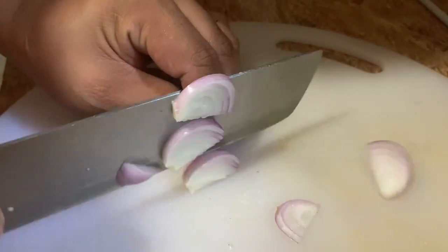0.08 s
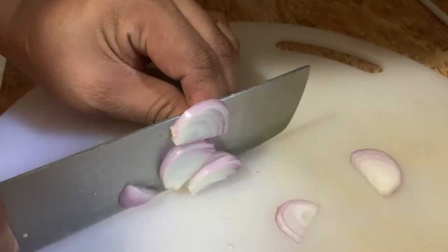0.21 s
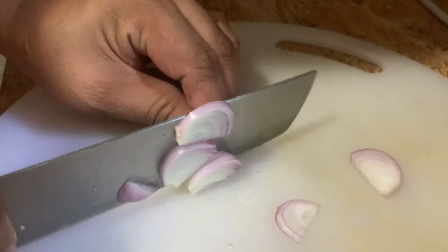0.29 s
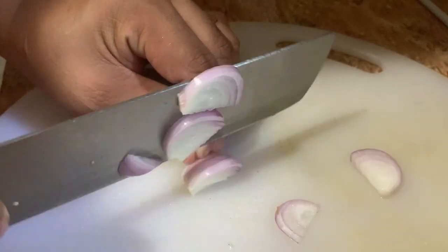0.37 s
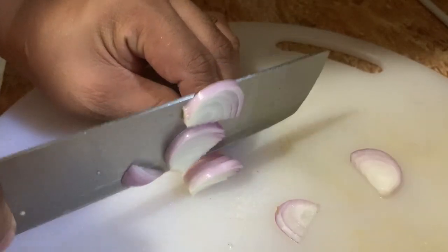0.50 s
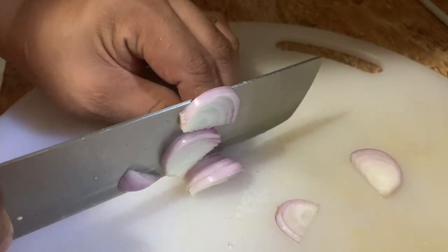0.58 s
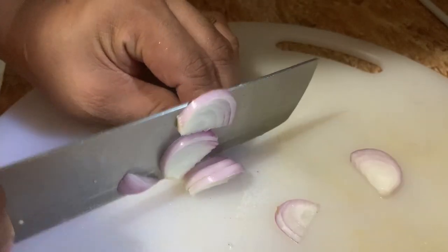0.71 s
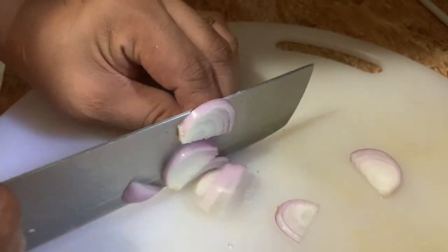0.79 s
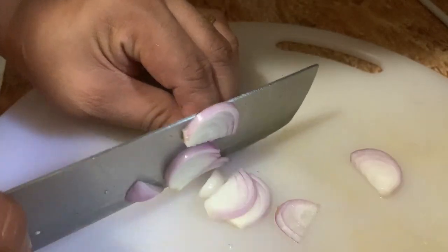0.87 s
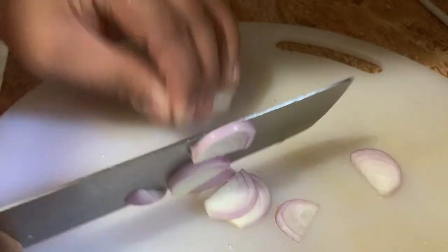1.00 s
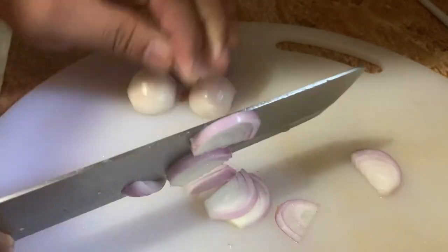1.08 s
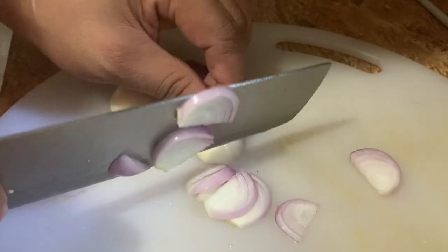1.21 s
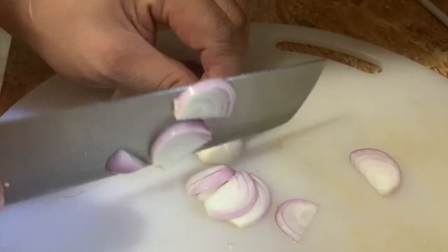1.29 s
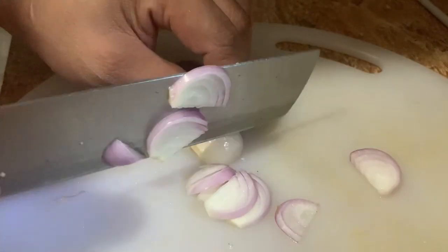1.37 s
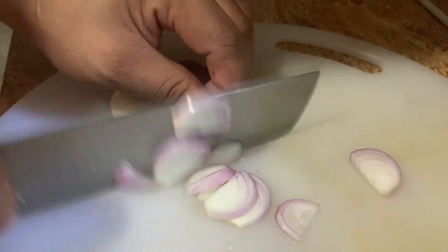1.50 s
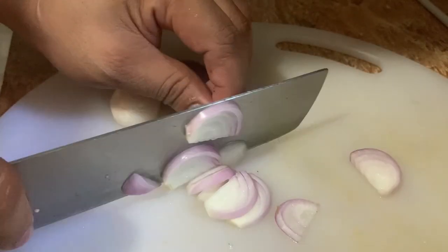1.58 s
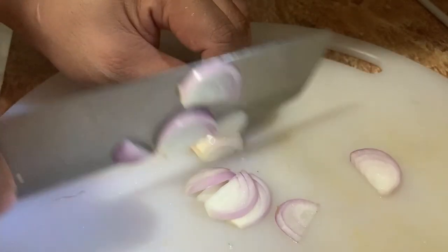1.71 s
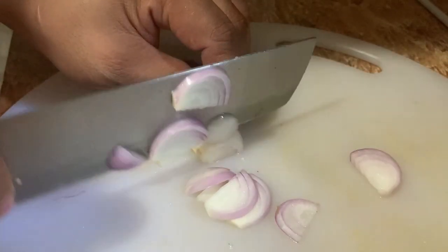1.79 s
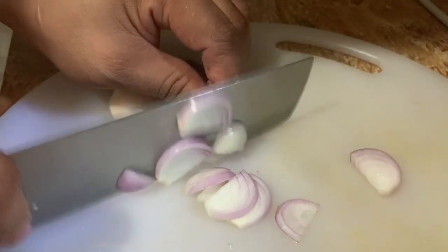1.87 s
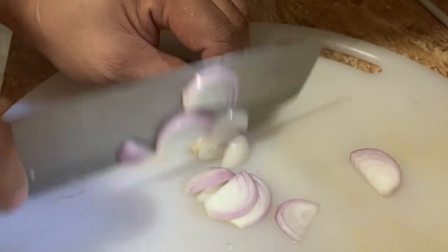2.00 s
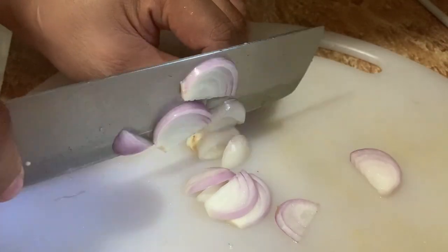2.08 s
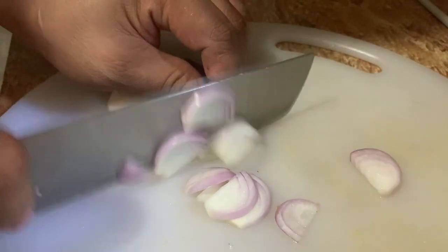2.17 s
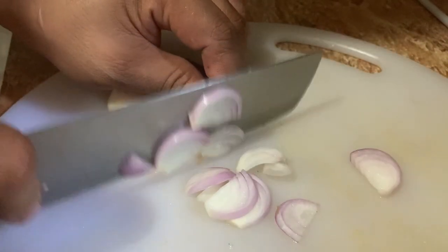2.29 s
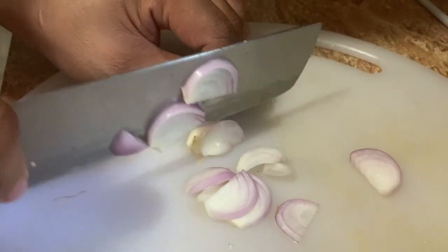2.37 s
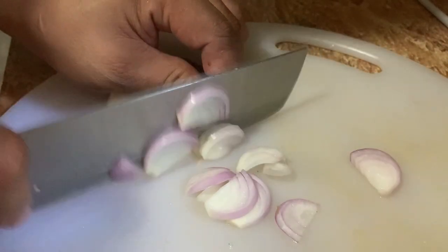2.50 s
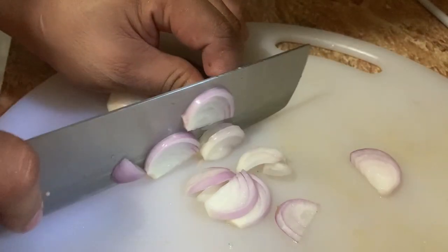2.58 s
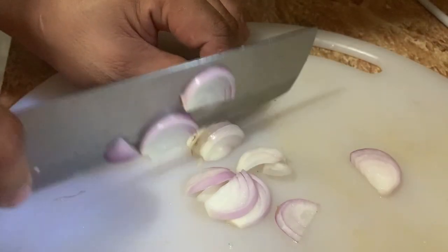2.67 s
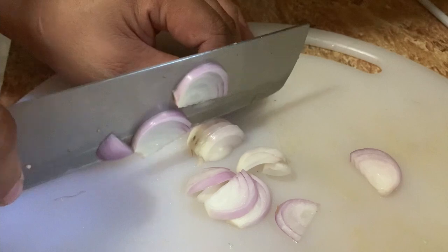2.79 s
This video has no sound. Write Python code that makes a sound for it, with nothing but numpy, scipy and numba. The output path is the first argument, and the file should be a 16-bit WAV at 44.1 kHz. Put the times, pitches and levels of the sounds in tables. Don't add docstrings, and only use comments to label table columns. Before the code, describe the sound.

A large knife crunches through wet onion layers and knocks hard on a plastic cutting board

```python
import sys
import numpy as np
from scipy import signal
from scipy.fft import rfft, irfft
from scipy.io import wavfile
from scipy.ndimage import uniform_filter1d
from numba import njit

SR = 44100
rng = np.random.default_rng(int(sys.argv[2]) if len(sys.argv) > 2 else 0)


def master_out(mix):
    frames = np.transpose(np.atleast_2d(mix))
    ceiling = np.clip(frames, -1, 1)
    pcm = np.round(ceiling * 32767).astype(np.int16)
    wavfile.write(sys.argv[1], SR, pcm)


def to_linear_factor(level_db):
    exponent = np.asarray(level_db, float) / 20
    return 10 ** exponent


N = 125685
T, F = np.arange(N) / SR, np.arange(N // 2 + 1) * SR / N

# time in s, peak in dB, contact time in ms, brightness in dB.
BLADE_KNOCKS = [(0.2146, 2.5, 0.16, 10), (0.824, -6, 0.56, 3), (1.081, -39, 1, -7), (1.565, 1.5, 0.85, -10),
                (1.934, 1, 0.27, 5.5), (2.233, 1, 0.35, 3), (2.567, -1.5, 0.91, -2), (1.841, -27, 0.4, 12),
                (2.207, -19, 0.37, 0), (2.5295, -29.5, 0.46, 0), (2.552, -22.5, 0.51, 2)]


def unit(x):
    return x / np.sqrt(np.mean(x ** 2))


def colour(x, points):
    hz, db = np.array(points).T
    return irfft(rfft(x) * to_linear_factor(np.interp(np.log(F + 1), np.log(hz), db)), N)


def ring(x, hz, t60):
    pole = np.exp(2j * np.pi * hz / SR - np.log(1000) / (t60 * SR))
    return signal.lfilter([1], [1, -pole], x).imag


def walk(rate):
    hold = int(SR / rate)
    steps = np.repeat(rng.standard_normal(N // hold + 1), hold)
    return unit(uniform_filter1d(uniform_filter1d(steps, hold), hold)[:N])


def force(tables, columns):
    out = np.zeros(N)
    for rows in map(np.array, tables):
        edge = np.clip(np.minimum(T - rows[0, 0], rows[-1, 0] - T) / 0.002, 0, 1)
        out += edge * to_linear_factor(np.interp(T, rows[:, 0], rows[:, 1:columns + 1].sum(axis=1)))
    return out


def crackle():
    grains_per_s, spread_db, fizz_db, stripe_db = 6000, 2, 2, 2.2
    hit = rng.random(N) < grains_per_s / SR
    clicks = hit * rng.standard_normal(N) * to_linear_factor(spread_db * rng.exponential(size=N))
    grains = unit(unit(clicks) + to_linear_factor(fizz_db) * rng.standard_normal(N))
    return grains * to_linear_factor(stripe_db * walk(150))


def patchy(x):
    patch_db, patches_per_s = 2.4, 110
    spectrum, centres = rfft(x), np.linspace(0, 18000, num=15)
    out = 0
    for hz in centres:
        band = np.clip(1 - np.abs(F - hz) / centres[1], 0, 1)
        out = out + to_linear_factor(patch_db * walk(patches_per_s)) * irfft(spectrum * band, N)
    return out


def snaps_and_ticks():
    # time in s, peak in dB, t60 in s, low part in dB.
    wet_ticks = [(0.0276, -38.5, 0.041, -10), (0.385, -50.5, 0.053, 5.5), (0.6196, -35, 0.038, -18),
                 (0.8425, -13.5, 0.012, -9.5), (0.8948, -53, 0.045, 6), (0.997, -48, 0.17, -11),
                 (1.0289, -33.5, 0.013, -14), (1.0807, -43, 0.025, -22), (1.2054, -51.5, 0.2, -2),
                 (1.681, -45, 0.036, -4), (2.02, -49.5, 0.057, -1), (2.0675, -37, 0.053, -8.5),
                 (2.4155, -23, 0.026, -12.5), (2.72, -42.5, 0.064, -25.5), (2.7733, -25.5, 0.033, -11.5),
                 (2.814, -31, 0.034, -15), (2.833, -46.5, 0.11, -7)]
    # time in s, peak in dB, t60 in s, low part in dB.
    layer_snaps = [(0.1602, -30, 0.03, -9), (0.175, -28, 0.015, -20), (0.187, -33, 0.02, -11),
                   (0.1964, -20, 0.04, -7.5), (0.205, -20, 0.044, -10.5), (0.213, -16, 0.02, -7),
                   (0.8066, -21, 0.033, -21), (0.816, -14, 0.02, -4), (1.524, -29, 0.03, -29),
                   (1.8417, -23.5, 0.036, -2.5), (1.889, -23.5, 0.034, -7), (1.9104, -25.5, 0.03, -15),
                   (1.918, -18.5, 0.033, -5), (2.167, -40, 0.026, -5), (2.1805, -29.5, 0.036, -4),
                   (2.209, -21.5, 0.024, -2.5), (2.5023, -22.5, 0.023, -4), (2.521, -26, 0.013, -17),
                   (2.5305, -15, 0.018, -6), (2.552, -20, 0.02, -5), (2.56, -20.5, 0.029, -5)]
    rise_s = 0.0012
    ticks, thuds = np.zeros(N), np.zeros(N)
    for s, db, t60, low_db in [*wet_ticks, *layer_snaps]:
        late_db = 60 * np.abs(T - s) / max(t60, 0.005)
        fall = np.clip((T - s) / rise_s + 0.5, 0, 1) * to_linear_factor(db - 11 - late_db)
        ticks += fall
        thuds += to_linear_factor(low_db) * fall
    return ticks, thuds


def blade(rubbing):
    # start in s, length in s, level in dB, pitch in Hz.
    whistles = [(0.665, 0.038, -63.5, 4440), (0.73, 0.052, -60, 4550), (0.814, 0.018, -34.5, 4850),
                (1.514, 0.038, -42, 4360), (1.522, 0.025, -49.5, 6800), (1.527, 0.063, -42.5, 11300),
                (1.89, 0.042, -44, 11400), (1.898, 0.034, -47, 5000), (2.523, 0.017, -40, 6700),
                (2.535, 0.027, -40, 11400), (0.2, 0.013, -34.5, 10870)]
    out = np.zeros(N)
    for s, length, db, hz in whistles:
        arch = np.sin(np.pi * np.clip((T - s) / length, 0, 1))
        out += to_linear_factor(db) * np.sqrt(np.clip(arch, 0, 1)) * unit(ring(rubbing, hz, 0.009))
    return to_linear_factor(3 * walk(120)) * out


def onion():
    # time in s, crunch in dB, push into the board relative to the crunch in dB.
    strokes = [
        [(0.09, -71, -18), (0.166, -44, -15.5), (0.182, -52.5, -10), (0.198, -35.5, -8), (0.214, -28.5, -3),
         (0.236, -48, -14), (0.3, -71, -12)],
        [(0.72, -81, -14), (0.73, -54.5, -16), (0.82, -31.5, -19), (0.838, -39, -18), (0.844, -37.5, -12),
         (0.854, -44, -14), (0.92, -71, -16)],
        [(1.48, -79, -12), (1.49, -63, -16), (1.532, -34.5, -15.5), (1.568, -31.5, -8), (1.578, -44.5, -16),
         (1.65, -68, -14)],
        [(1.835, -55, -12), (1.843, -42.5, -19), (1.859, -48, -7), (1.887, -37, -15), (1.915, -30, -16),
         (1.939, -32.5, -9), (1.955, -53.5, -22), (2.0, -62.5, -19)],
        [(2.16, -72, -14), (2.166, -56, -8), (2.212, -30.5, -9.5), (2.236, -27, -2), (2.258, -51, -14),
         (2.31, -65, -12)],
        [(2.495, -52, -10), (2.501, -37.5, -15.5), (2.519, -40, -11), (2.529, -33.5, -15), (2.567, -28, -16),
         (2.579, -46.5, -23), (2.64, -63, -17)],
    ]
    # time in s, level in dB.
    slides = [
        [(0.27, -80), (0.36, -63), (0.42, -76.5)],
        [(0.61, -87.5), (0.668, -58.5), (0.73, -71)],
        [(0.97, -71.5), (1.13, -80)],
        [(1.64, -72), (1.71, -74)],
        [(2.0, -70), (2.064, -63), (2.1, -86)],
        [(2.36, -67), (2.45, -63)],
        [(2.66, -70), (2.726, -72), (2.85, -87)],
    ]
    # frequency in Hz, level in dB.
    crunch = [(2200, -18.5), (3300, -5), (4500, 0), (6500, 0), (8000, 0), (11000, 4), (13300, 2),
              (15500, 3.5)]
    # frequency in Hz, level in dB.
    unlike = [(5000, 0), (7500, -15)]
    ticks, thuds = snaps_and_ticks()
    shared = crackle()
    air = np.array([shared + colour(crackle(), unlike) for _ in range(2)])
    gain = force(strokes, 1) + force(slides, 1) + ticks
    air = gain * unit(patchy(colour(air, crunch)))
    push = force(strokes, 2) + thuds
    bite = to_linear_factor(3.5) * push * unit(ring(np.array([crackle(), crackle()]), 2320, 0.0038))
    return to_linear_factor(2.5) * (air + blade(shared)) + bite, push * crackle()


def board(push):
    # frequency in Hz, level in dB, t60 in s, left minus right in dB.
    modes = [(157.5, -20.5, 0.055, 32.5), (214, -32, 0.24, -42.5), (332, -1.5, .06, 0), (353, 3, 0.09, 2.5),
             (462.8, 6.5, 0.038, -1.5), (505, -14, 0.18, -27), (689, -2, 0.12, -14), (788, 1.5, 0.018, 21),
             (983, 0.5, 0.028, 2.5), (1254, 8.5, 0.016, 4.5), (1483, 0, 0.035, 1), (1940, -9, 0.0086, 25),
             (2070, -3, 0.012, -19.5), (2580, -4, 0.019, 31)]
    front = (1020, 14.5, 0.0033, 1.5)
    knock_db, scatter_db, longest_t60_s = -9, 2, 0.055
    delay_300hz_ms, delay_power, right_lag_ms = 3.214, 0.778, 0.16
    low_hz, top_hz = 190, 2400
    out = np.zeros((2, N))
    scatter = rng.standard_normal((len(BLADE_KNOCKS), len(modes) + 1))
    for k, (hz, db, t60, pan_db) in enumerate([front, *modes]):
        drive = push.copy()
        for (s, peak_db, ms, _), luck in zip(BLADE_KNOCKS, scatter):
            blow = np.exp(-((T - s - 0.001) / (ms * 0.000095)) ** 2)
            drive -= to_linear_factor(peak_db + knock_db + scatter_db * luck[k]) / ms * blow
        out += ring(drive, hz, min(t60, longest_t60_s)) * to_linear_factor(db + np.array([[0.5], [-0.5]]) * pan_db)
    delay = delay_300hz_ms / 1000 * (np.maximum(F, 100) / 300) ** -delay_power
    delay = delay + np.array([[0], [right_lag_ms / 1000]])
    turn = np.exp(-2j * np.pi * np.cumsum(delay, axis=1) * SR / N)
    loss = 1 + (low_hz / (F + 1)) ** 4 + (F / top_hz) ** 6
    return irfft(rfft(out) * turn / loss, N) / 20


def clatter():
    # frequency in Hz, level in dB.
    tail_points = [(150, -32), (400, 6), (1200, 5.5), (2500, -8), (5000, -54.5)]
    resonance_hz = [347.8, 454]
    tail_db, tail_t60_s, rise_s, resonance_db = -23, 0.17, 0.0069, -1.5
    crack_hz, crack_db, crack_t60_s = 2280, -17.5, 0.035

    def fall(s, db, t60):
        return to_linear_factor(db - 60 * np.abs(T - s) / t60) * np.clip((T - s) / rise_s, 0, 1)

    dull, bright = np.zeros(N), np.zeros(N)
    for s, db, _, up_db in BLADE_KNOCKS:
        dull += fall(s, db + tail_db, tail_t60_s)
        bright += fall(s, db + up_db + crack_db, crack_t60_s)
        bright += fall(s, db + up_db + crack_db - 21.5, 1.45 * tail_t60_s)
    noise = rng.standard_normal((2, 2, N))
    resonance = sum(unit(ring(noise[0], hz, 0.11)) for hz in resonance_hz)
    tail = unit(colour(noise[0], tail_points)) + to_linear_factor(resonance_db) * resonance
    crack = unit(ring(noise[1], crack_hz, 0.0023))
    return to_linear_factor(2 * walk(200)) * (dull * tail + bright * crack)


def ports(x):
    # frequency in Hz, lead in radians.
    lead = [(0, 0), (2500, -3.1), (6500, -5.4), (8000, -4.4), (8700, -3.14), (9400, -1.9), (12800, 1.9),
            (13400, 3.14), (14000, 4.4), (15300, 6.1), (22050, 6.5)]
    hz, turn = np.array(lead).T
    right = irfft(rfft(x[1]) * np.exp(1j * np.interp(F, hz, turn)), N)
    return np.array([x[0], right])


@njit
def walls(x, lags, gain, damp):
    line, soft, out = np.zeros((8, 4096)), np.zeros(8), np.zeros((2, len(x)))
    for i in range(len(x)):
        total = 0.
        for k in range(8):
            soft[k] += (1 - damp) * (gain[k] * line[k, (i - lags[k]) & 4095] - soft[k])
            total += soft[k]
            out[k % 2, i] += soft[k]
        for k in range(8):
            line[k, i & 4095] = x[i] + soft[k] - total / 4
    return out


def room(x):
    t60_s, damp = 0.26, 0.23
    lags = np.array([211, 293, 397, 509, 631, 773, 929, 1103])
    return walls(x.mean(axis=0) + 1e-18, lags, to_linear_factor(-60 * lags / SR / t60_s), damp)


def kitchen():
    # frequency in Hz, level in dB per Hz.
    tone = [(35, -59), (45, -16), (160, -10.5), (300, -20.5), (1270, -26.5), (3000, -36), (7000, -53.5),
            (16000, -54.5)]
    # frequency in Hz, width in Hz, level in dB.
    hums = [(49.1, 15, -60.5), (99.7, 5.7, -59.5), (119.4, 23, -54.5), (348, 25, -64.5), (470.8, 23, -62),
            (727, 28, -70), (1250, 270, -66)]
    # time in s, kitchen swell in dB, motor tone in dB.
    swell = [
        (0, 0, -61.5),
        (1.151, 0.5, -76.5),
        (1.221, 2, -51.5),
        (1.5, 4.5, -59.5),
        (2.1, 5, -71.5),
        (2.55, 5.5, -68),
        (2.66, 5.5, -55.5),
        (2.85, 7.5, -54.5),
    ]
    tone_db, alike_hz, motor_hz = -55.5, 380, 259

    def bed():
        out = to_linear_factor(tone_db) * unit(colour(rng.standard_normal(N), tone))
        for hz, width, db in hums:
            out = out + to_linear_factor(db) * unit(ring(rng.standard_normal(N), hz, 2.8 / width))
        return out

    s, swell_db, motor_db = np.array(swell).T
    alike = 1 / (1 + (F / alike_hz) ** 2.7)
    mid = irfft(rfft(bed()) * np.sqrt((1 + alike) / 2), N)
    side = irfft(rfft(bed()) * np.sqrt((1 - alike) / 2), N)
    motor_gain = to_linear_factor(np.interp(T, s, motor_db) + 2 * walk(11))
    pitch = motor_hz * (1 + 0.0036 * walk(5.5))
    motor = motor_gain * np.sin(2 * np.pi * np.cumsum(pitch) / SR)
    both = to_linear_factor(np.interp(T, s, swell_db)) * np.array([mid + side, mid - side]) + motor
    return both * to_linear_factor(np.array([[-0.9], [0.9]]))


def scene():
    air, push = onion()
    knock = board(push) + clatter()
    return knock + ports(air) + to_linear_factor(-23) * room(knock + air) + kitchen()


def roll_off(x):
    return signal.sosfilt(signal.butter(12, 17000, fs=SR, output="sos"), x)


def record(dry):
    low_pass = signal.ellip(10, 0.2, 70, 15750, fs=SR, output="sos")
    high_pass = signal.butter(4, 36, "high", fs=SR, output="sos")
    cut = signal.sosfilt(low_pass, np.tanh(dry))
    cut = signal.sosfilt(high_pass, cut)
    return roll_off(cut)


dry = scene()
out = record(dry)
master_out(out)
```